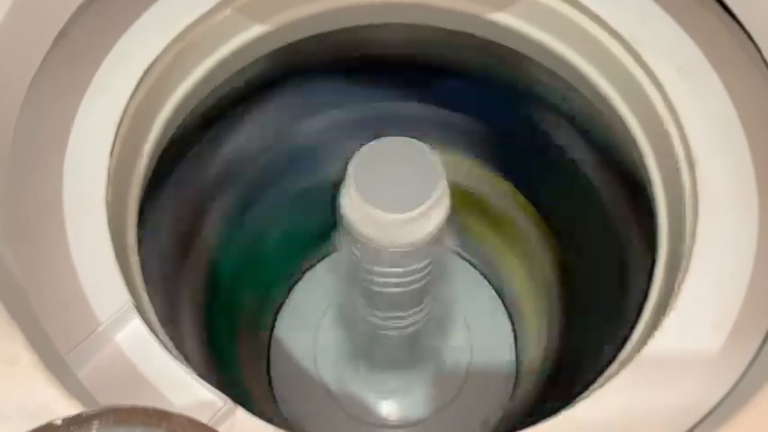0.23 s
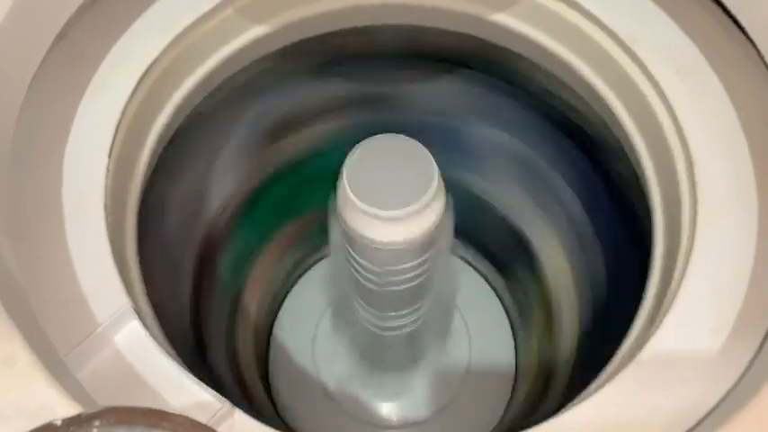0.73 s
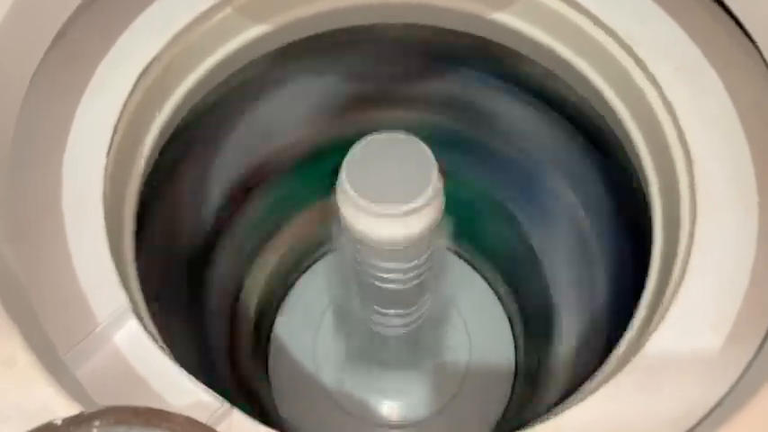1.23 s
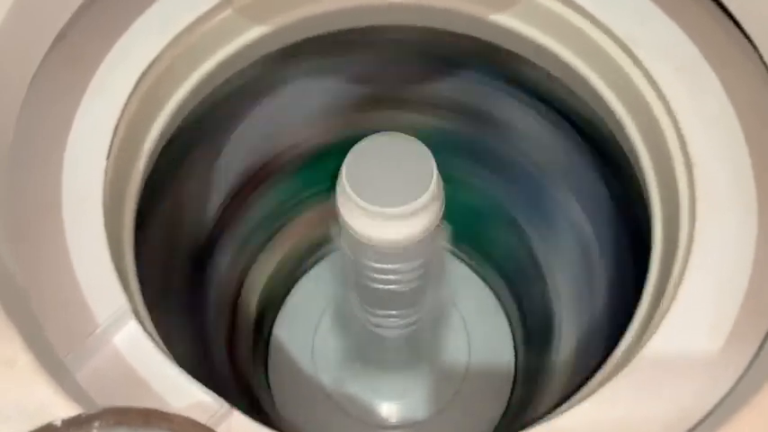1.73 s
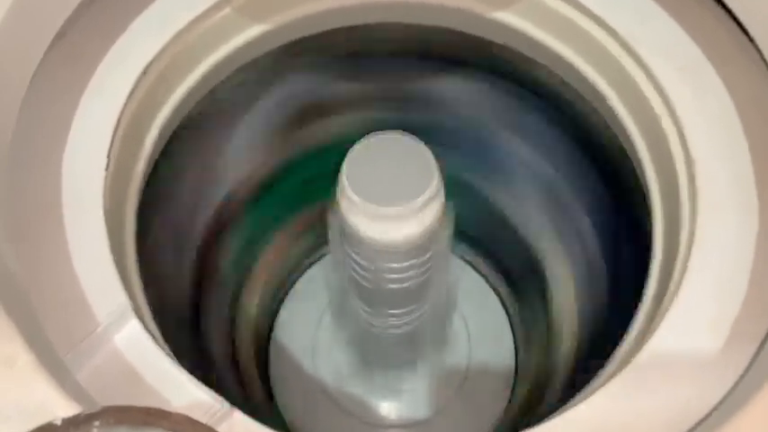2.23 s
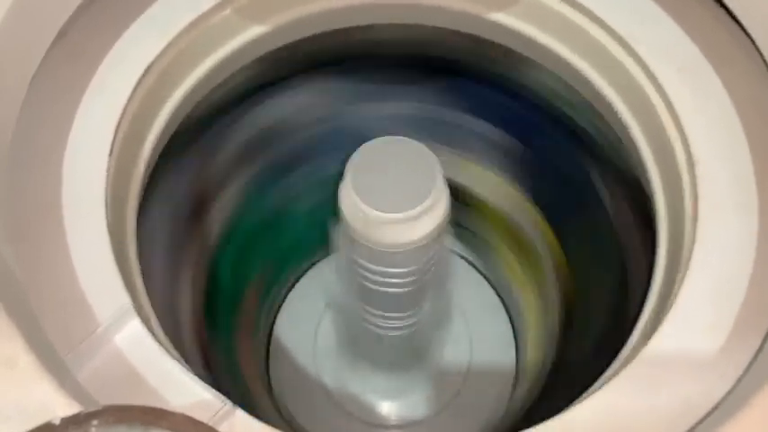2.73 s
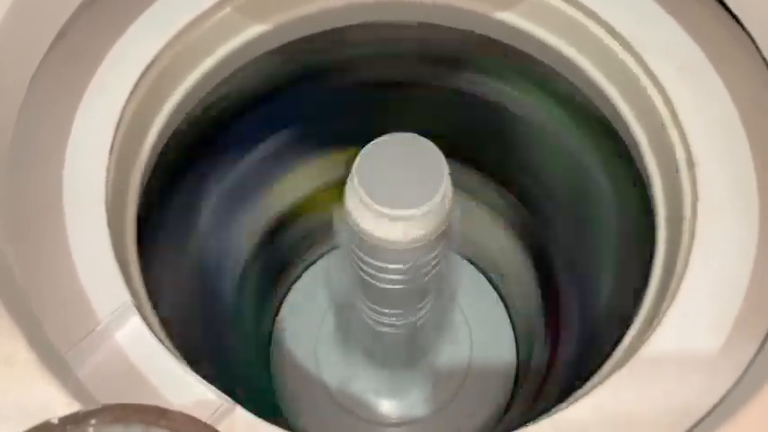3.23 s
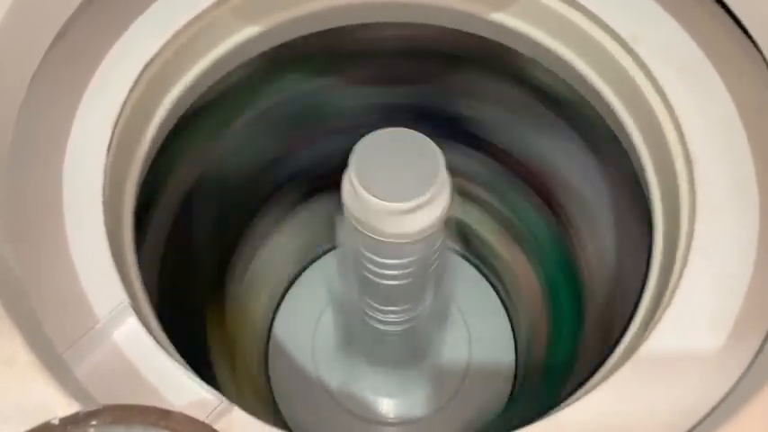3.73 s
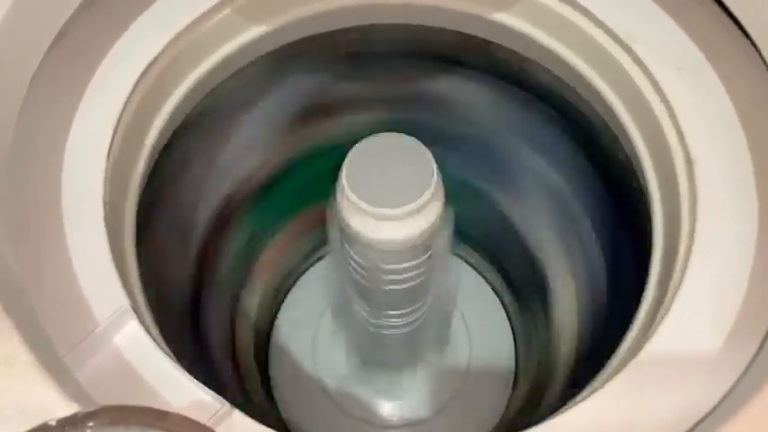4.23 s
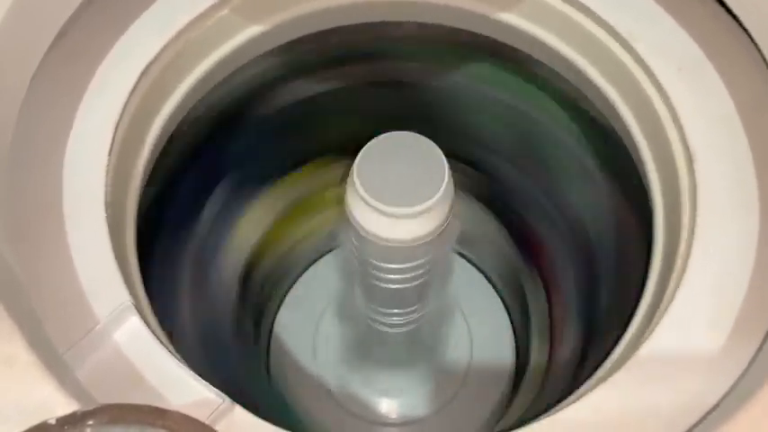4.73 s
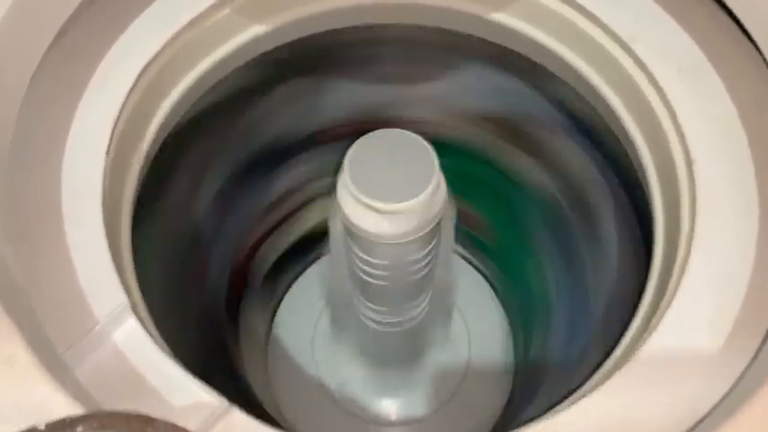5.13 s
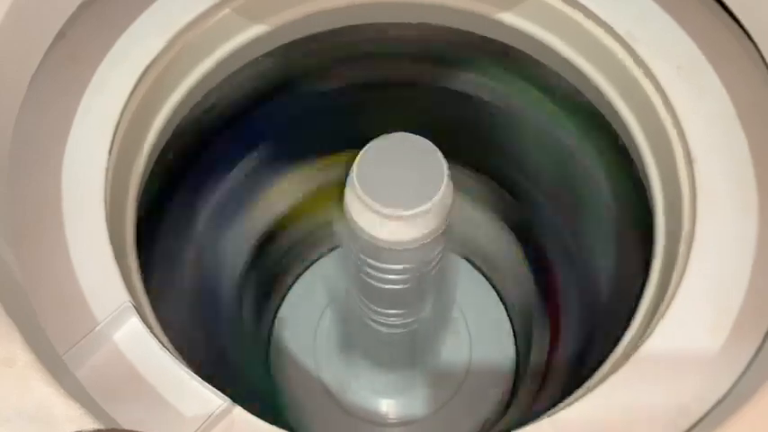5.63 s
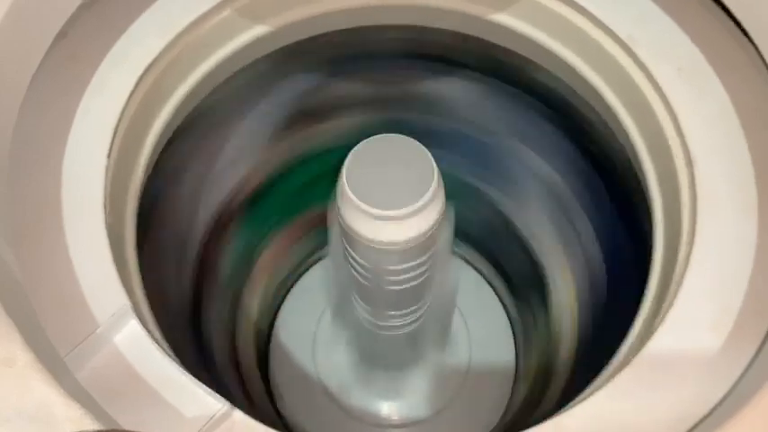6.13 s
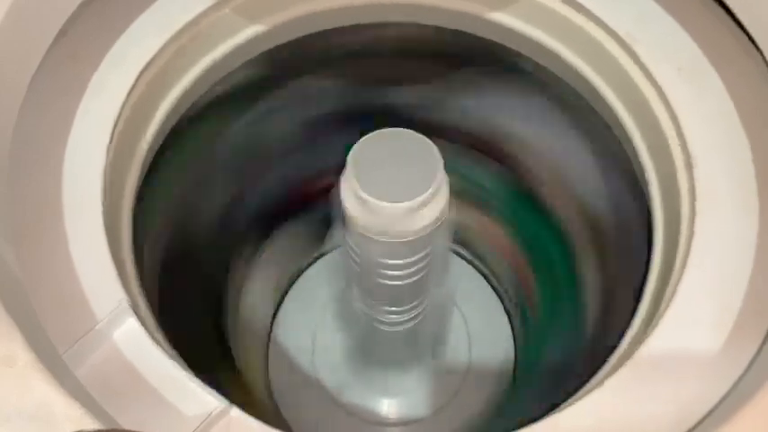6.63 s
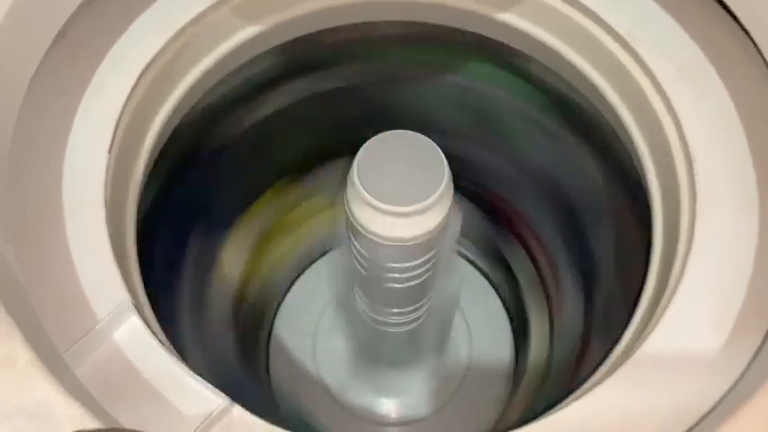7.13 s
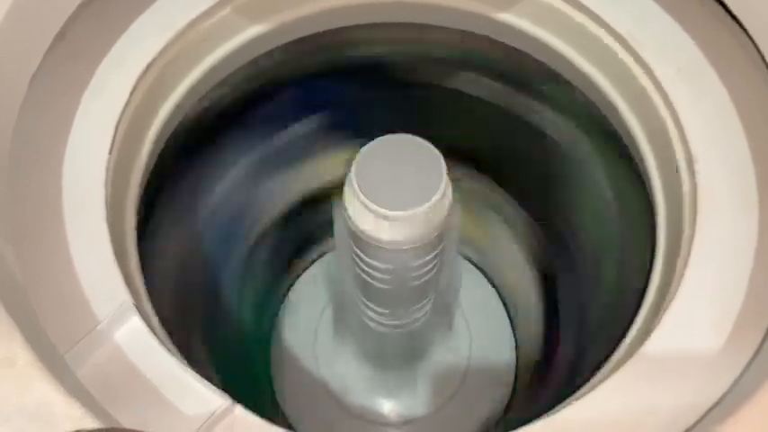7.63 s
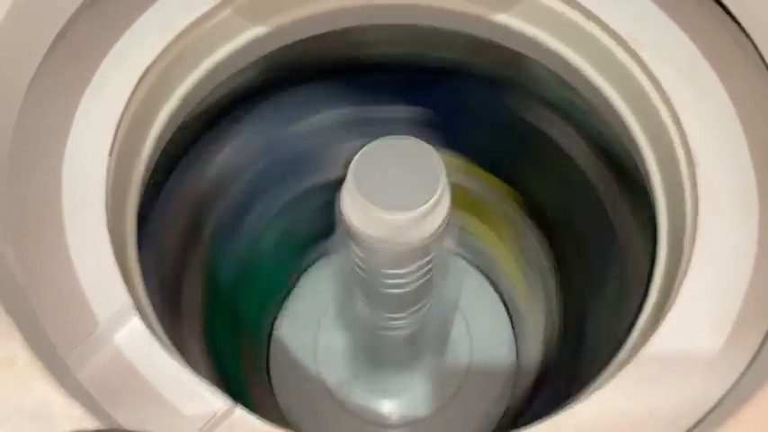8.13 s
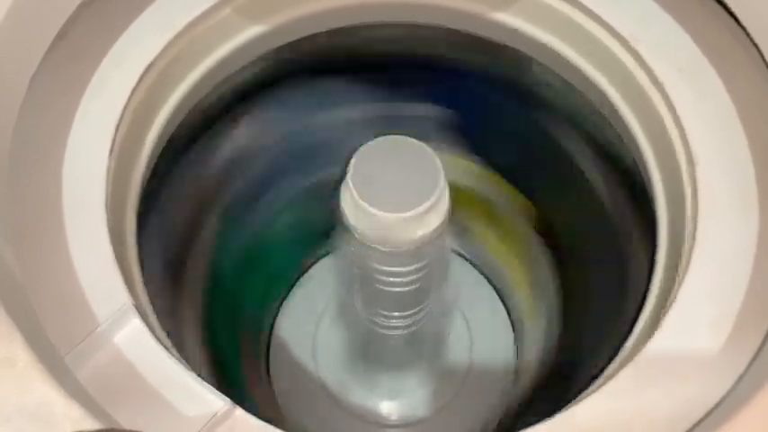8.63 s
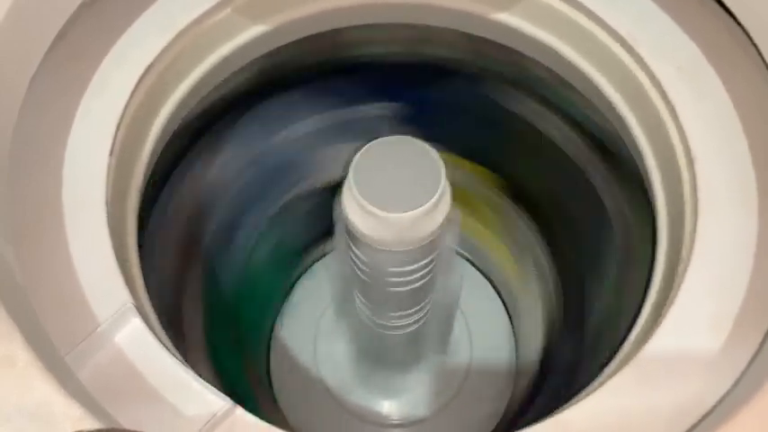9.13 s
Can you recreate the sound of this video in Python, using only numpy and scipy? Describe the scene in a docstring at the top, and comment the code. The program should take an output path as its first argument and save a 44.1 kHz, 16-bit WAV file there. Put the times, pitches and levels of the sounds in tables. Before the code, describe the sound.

Close above the open lid of a top-load washer, a wet load spins with deep shaking rumble, boomy panels and fluttering roar. A motor hums unevenly under a thin whine. For about three seconds water ticks and spatters rapidly on the tub wall, then drains in small chirping drips. Near five seconds comes one hollow knock with a splash. Everything slowly sinks in pitch and level.

```python
"""A wet load spins in a top-load washer, lid open, heard by two microphone ports just above the opening.
The tub rumbles and shakes in tones that sink as the basket slows from about ten to under eight turns a second.
Noise shaped by resonances booms and roars with brief accents, the motor hums and a drive whines.
For about three seconds water spurts tick and spatter on the tub wall, mostly two a turn, over wash and spray.
Near five seconds the tub knocks once with a splash, and the frame throbs on."""
import sys
import numpy as np
from scipy import signal
from scipy.fft import rfft, irfft
from scipy.io import wavfile
from scipy.ndimage import uniform_filter1d

SR = 44100
rng = np.random.default_rng(int(sys.argv[2]) if len(sys.argv) > 2 else 0)


def persist_wave(psi):
    """Save psi, clipped to +-1, as 16-bit WAV."""
    counts = np.round(np.clip(psi, -1, 1) * 32767).astype(np.int16)
    wavfile.write(sys.argv[1], SR, np.atleast_2d(counts).T)


N = 414540

# between the two microphone ports: f/Hz, likeness (0 to 1)
PORT_LIKENESS = [(30, .97), (60, .995), (130, .975), (290, .88), (640, .73), (1000, .53), (1500, .38),
                 (3000, .3), (5500, .45), (8000, .93), (15000, .98)]
# f/Hz, phase by which the left port leads/rad
PORT_LEAD = [(30, 0), (850, .1), (1400, -.9), (2400, -1.5), (4400, -1.0), (6400, 0), (8550, -3.14),
             (10900, -6.28), (13500, -9.42), (15800, -12.57)]
# f/Hz, left minus right level/dB
PORT_BALANCE = [(60, 1), (110, .8), (200, .6), (380, 1.7), (700, 2.5), (1290, 2.4), (2380, 1.2),
                (4400, -1.7), (8120, -.4), (15000, 0)]

# motor hum: multiple of the mains, relative level/dB
HUM_PARTIALS = [(1, -17), (2, -2), (4, -14.5)]
# the hum swells and eases: t/s, level/dB
HUM_LEVEL = [(0, -51), (.35, -32.5), (.53, -45), (1.0, -24.5), (1.32, -44), (1.62, -25.5), (1.88, -44),
             (2.1, -35.5), (2.8, -30.5), (3.65, -35.5), (4.1, -27.5), (5.05, -39), (5.4, -32),
             (5.65, -38.5), (6.65, -35), (7.35, -31), (7.8, -38), (9.25, -28.5)]
# housing resonances that let the whine through: f/Hz, width/Hz, relative level/dB
HOUSING_MODES = [(1350, 12, 4), (1253, 63, 4), (1160, 10, -2)]
# tones of the motor's shaft: multiple of its own rate, relative level/dB
ROTOR_TONES = [(5, -52), (6, -52), (7, -54), (8, -57), (10, -49), (11, -51), (12, -51), (14, -55),
               (15, -60), (16, -61)]

# broad boom of the side panels: f/Hz, relative level/dB
BOOM_COLOUR = [(90, -17), (138, 4), (170, -1.5), (260, -0.5), (380, -3.5), (425, -14.5), (520, -39),
               (900, -56)]
# side panel resonances above the boom: f/Hz, width/Hz, relative level/dB
PANEL_MODES = [(193, 30, 0.5), (203.5, 17.5, -2), (224, 16, -5.5), (309, 13, 3.5), (347, 56, -1.5),
               (368.7, 19, 4)]
# broad roar of churned air: f/Hz, relative level/dB
ROAR_COLOUR = [(250, -14.5), (430, -8), (510, -3.5), (650, -3), (760, -6.5), (900, -11.5), (1050, -16),
               (1400, -22.5), (2000, -28.5), (3500, -43), (8000, -58)]
# cabinet resonances above the roar: f/Hz, width/Hz, relative level/dB
CABINET_MODES = [(461.8, 8.3, 11), (612, 37, 0), (712, 9.6, 6.5), (727.6, 11.4, 6), (785, 5, 7),
                 (838, 6.4, 4.5), (955, 31.5, 9), (1092, 19, 3.5), (1178, 24, 8.5), (1234, 17.4, 11.5),
                 (1344, 18, 9.5), (1503, 48, 8), (1740, 29, 9), (1890, 30, -1)]
# the load shifts and the roar surges: t/s, spread/s, rise in level/dB
SURGES = [(0.173, 0.014, 4), (0.626, 0.16, 0), (0.937, 0.12, 1.5), (2.767, 0.054, 1.5), (3.05, 0.021, 3.5),
          (5.358, 0.096, 2), (6.602, 0.07, 0.5), (7.175, 0.25, 1.5), (8.74, 0.1, 3)]
# brief accents in the roar: t/s, relative level/dB, f of the short ring/Hz
ACCENTS = [(0.054, -20, 684), (0.144, -20, 460), (0.585, -13, 456), (0.925, -22, 447), (1.661, -16, 490),
           (1.788, -25, 660), (2.786, -14, 600), (3.618, -26, 606), (4.197, -20, 723), (4.233, -21, 745),
           (4.336, -24, 610), (4.595, -25, 474), (5.325, -19, 743), (5.697, -28, 580), (6.074, -19, 626),
           (6.531, -17.5, 550), (7.062, -18, 460), (7.11, -31, 585), (7.221, -20, 733), (7.261, -13.5, 457),
           (8.538, -20, 744), (8.914, -19.5, 706), (9.294, -27, 600)]

# water washing round the tub: f/Hz, relative level/dB
WASH_COLOUR = [(700, -0.6), (1400, -0.6), (1800, 3.4), (2100, 3.4), (2500, 3.4), (3000, -2.1),
               (3600, -11.6), (5000, -17.1), (9000, -41)]
# fine spray on the wall: f/Hz, relative level/dB
SPRAY_COLOUR = [(2000, -18.1), (3600, 4.4), (4200, 8.4), (4650, 10.1), (5300, 2.1), (6300, 4.6),
                (8000, -10.4), (9000, -7.1), (10800, -2.1), (13000, 2.4), (14500, -4.1), (16000, -4.6)]
# drops bursting on the wall: f/Hz, relative level/dB
SPATTER_COLOUR = [(2500, -59), (4400, 2.6), (5500, 3.6), (6800, 8.1), (9000, 7.1), (10800, 7.1),
                  (13000, -5.9), (16000, 2.5)]
# steel basket resonances in wash and spray: f/Hz, width/Hz, relative level/dB
BASKET_MODES = [(2366, 70, -1.4), (3300, 84, 1), (4680, 63, 0.6), (4900, 76, -0.6), (7580, 390, 10.8),
                (9420, 460, 12.3)]
# big single drops: t/s, level/dB
BIG_DROPS = [(.064, -36), (.543, -42), (.727, -40), (1.021, -40), (1.505, -37), (1.722, -37), (2.322, -41),
             (2.503, -35), (2.706, -33), (2.948, -39)]
# wall resonances under single drops: f/Hz, width/Hz, relative level/dB
DROP_MODES = [(2700, 830, -2.5), (4450, 500, 3.5), (6400, 1500, -3), (10400, 1500, -8)]
# spurts on the tub wall: t/s, relative slap level/dB, relative spatter level/dB
SPURTS = [(0.0275, -37, -46), (0.0605, -34, -39), (0.1057, -38, -50), (0.1382, -34, -53),
          (0.2054, -44, -49), (0.2339, -41, -48), (0.3017, -40, -47), (0.3266, -34, -46),
          (0.3955, -34, -49), (0.4299, -39, -55), (0.513, -32, -46), (0.5886, -43, -48), (0.6215, -38, -58),
          (0.6917, -33.5, -49), (0.7794, -41, -55), (0.8126, -42, -56), (0.8918, -33, -46),
          (0.92, -34, -43), (0.9762, -40, -48), (1.0026, -33, -43), (1.0231, -42, -54), (1.0725, -48, -55),
          (1.0989, -39, -58), (1.1812, -33.5, -43.5), (1.2104, -37, -52), (1.271, -39, -53),
          (1.298, -33.5, -44), (1.3912, -37, -50), (1.4147, -40, -50), (1.4725, -32.5, -44),
          (1.498, -30, -42), (1.5638, -41, -47), (1.5958, -33, -50), (1.6791, -34.5, -43),
          (1.713, -34.5, -44), (1.7664, -39, -48), (1.793, -33.5, -49), (1.9195, -45, -57),
          (1.9777, -33, -49), (2.0086, -37, -51), (2.0687, -37, -47), (2.094, -37, -50), (2.171, -36, -43),
          (2.1997, -40, -46), (2.2847, -32.5, -41), (2.319, -32.5, -39), (2.3757, -36, -47),
          (2.4074, -34.5, -48), (2.489, -30.5, -42), (2.5272, -36, -45), (2.5731, -43, -62),
          (2.592, -32.5, -36), (2.692, -35, -38), (2.7442, -46, -46.5), (2.8075, -46, -47),
          (2.8559, -48, -53), (2.9083, -45, -53), (2.9507, -42, -47)]
# tub wall resonances under a spurt: f/Hz, width/Hz, relative level/dB
SLAP_MODES = [(2500, 590, 1), (3030, 510, -1.5), (5200, 2500, -10)]
# drips chirping as the wall drains: t/s, starting f/Hz, level/dB
DRIPS = [(2.706, 2060, -41), (2.744, 2130, -40), (2.807, 2160, -43), (2.808, 2600, -48), (2.852, 2400, -48),
         (2.857, 2140, -39), (2.908, 2150, -42), (2.909, 2420, -45), (2.948, 2600, -47), (3.031, 2130, -43),
         (3.094, 2410, -44), (3.135, 2380, -48)]

# scuffs of wet cloth: t/s, spread/s, level/dB
SCUFFS = [(7.27, .014, -43), (8.8, 0.013, -40)]
# brief panel drones: t/s, spread/s, f at that moment/Hz, level/dB
DRONES = [(0.18, 0.047, 463, -31.5), (0.294, 0.34, 726, -42), (0.623, 0.038, 461, -29.5),
          (0.55, 0.11, 219, -36.5), (0.603, 0.24, 335, -39), (1.686, .07, 180, -34.5),
          (1.782, 0.06, 322, -36), (1.808, 0.021, 690, -33), (2.783, 0.08, 368.6, -35.5),
          (3.056, 0.06, 361.4, -36), (4.155, .07, 195.5, -38), (4.3, .1, 356, -41), (5.204, .1, 180.6, -38),
          (5.761, 0.066, 332, -37), (6.85, 0.089, 196, -34), (7.1, 0.17, 318, -37),
          (7.377, 0.048, 193.3, -31), (7.783, 0.072, 193, -37.5), (8.251, 0.15, 364, -40),
          (8.737, 0.042, 474, -36)]
# modes of the knocked tub: f/Hz, level/dB, t60/s
KNOCK_MODES = [(107.6, -16, .25), (160, -21, .14), (190, -22, .22), (242, -8.5, .11), (490, -26, .06),
               (1225, -30, .035)]

# the load heaves and the tub swells: t/s, spread/s, rise in level/dB
HEAVES = [(0.397, 0.029, 6), (1.03, 0.053, 2), (2.043, 0.013, 7), (2.7, 0.13, 2.5), (4.13, 0.011, 6.5),
          (6.675, 0.016, 7)]
# random rumble of the tub: f/Hz, relative level/dB
RUMBLE_COLOUR = [(20, -53), (33, -39), (41, -17), (52, -17), (70, -4), (95, -1), (118, 0), (150, -14),
                 (300, -35), (1200, -110)]
# how strongly the tub answers a shake: f/Hz, relative level/dB
TUB_RESPONSE = [(50, -29), (58, -16), (65, -10.5), (70, -5.5), (77, -0.5), (85, -2.5), (93, 1.5), (100, 0),
                (122, 0), (135, -8), (150, -15)]
# tones of the basket: multiple of its turning rate, relative level/dB
BASKET_SHAKES = [(6, -40), (7, -32.5), (8, -34), (9, -40), (10, -40), (11, -36), (13, -39), (14, -44),
                 (15, -44)]
# tones of the belt: multiple of its own rate, relative level/dB
BELT_SHAKES = [(10, -40), (11, -35), (12, -35.3), (13, -33.5), (14, -33), (15, -45), (17, -41), (18, -42),
               (19, -40), (21, -42), (22, -44)]

# speed of the basket at the start, its loss each second, and how that loss eases
TURNS_PER_S, SLOWING_PER_S2, EASING_PER_S3 = 10.477, .3041, .0018
# rounds of the belt, rounds of the motor's shaft and cycles of whine and frame throb per turn of the basket
BELT_PER_TURN, ROTOR_PER_TURN, WHINE_PER_TURN, THROB_PER_TURN = .6554, 6.358, 139.88, 5
MAINS_HZ = 60.05
KNOCK_S = 4.886
SPLASH_S, SPLASH_SPREAD_S = 4.885, .06
# water flies until this time, then dies away
FLING_END_S, FLING_FADE_S = 2.5, .12


def from_db(db):
    """Decibels to gain."""
    return 10 ** (np.asarray(db) / 20)


def to_left(db):
    """Gains that set the left port this many dB above the right."""
    return from_db([[db / 2], [-db / 2]])


def rms_one(x):
    """Scale to unit rms."""
    return x / np.sqrt(np.mean(x ** 2) + 1e-20)


def seconds():
    """Time of every sample."""
    return np.arange(N) / SR


def bins():
    """Frequency of every spectral bin in Hz, at least 1."""
    return np.maximum(np.arange(N // 2 + 1) * SR / N, 1)


def in_hz(points):
    """Join (f/Hz, value) points on a log-frequency axis."""
    hz, value = np.transpose(points)
    return np.interp(np.log(bins()), np.log(hz), value)


def drift(rate_hz):
    """Random wander of rms 1, ever weaker above its rate."""
    white = rfft(rng.standard_normal(N))
    return rms_one(irfft(white / (1 + (bins() / rate_hz) ** 2), N))


def swell(s, spread_s):
    """A smooth bell-shaped rise and fall around one moment."""
    return np.exp(-.5 * ((seconds() - s) / spread_s) ** 2)


def sinking(start_db, fall_db_per_s):
    """A level in dB that falls evenly with time."""
    return start_db - fall_db_per_s * seconds()


def speed():
    """Turns of the basket per second as it coasts down."""
    return TURNS_PER_S - SLOWING_PER_S2 * seconds() + EASING_PER_S3 * seconds() ** 2


def turns():
    """Turns of the basket so far."""
    return np.cumsum(speed()) / SR


def resonances(modes):
    """Summed power response of (f/Hz, width/Hz, level/dB) resonances."""
    f = bins()
    total = np.zeros(len(f))
    for hz, width, db in modes:
        detuning = (f * f - hz * hz) / (f * width)
        total += from_db(db) ** 2 / (1 + detuning ** 2)
    return total


def each_turn(size=4096):
    """Two random patterns that come round again with every turn of the basket."""
    place = turns() % 1 * size
    patterns = rng.standard_normal((2, size))
    return np.array([np.interp(place, np.arange(size), pattern) for pattern in patterns])


def stereo_noise(gain, unit=True, repeating=0):
    """Coloured noise at the two ports, a share of its power repeating every turn; rms 1 if unit."""
    white = rng.standard_normal((2, N))
    if repeating:
        white = np.sqrt(1 - repeating) * white + np.sqrt(repeating) * each_turn()
    mid, side = rfft(white)
    alike = np.clip(in_hz(PORT_LIKENESS), 0, 1)
    sign = np.array([[1], [-1]])   # left, right
    pair = np.sqrt(1 + alike) * mid + sign * np.sqrt(1 - alike) * side
    balance = from_db(sign * in_hz(PORT_BALANCE) / 2)
    lead = np.exp(.5j * sign * in_hz(PORT_LEAD))
    noise = irfft(gain * pair * balance * lead, N)
    return rms_one(noise) if unit else noise


def resonant_noise(broad, modes, waver_db=2.5, groups=3):
    """Partly repeating broad noise, with groups of resonances that wax and wane independently; rms 1."""
    colour = from_db(in_hz(broad))
    noise = stereo_noise(colour, unit=False, repeating=.45)
    for k in range(groups):
        peaks = stereo_noise(colour * np.sqrt(resonances(modes[k::groups])), unit=False)
        noise = noise + peaks * from_db(waver_db * drift(.48))
    return rms_one(noise)


def tone(hz, waver_db, waver_hz, wander_rad):
    """A sine of rms about 1 that wavers in level and phase."""
    phase = 2 * np.pi * np.cumsum(hz * np.ones(N)) / SR + wander_rad * drift(waver_hz)
    return np.sqrt(2) * np.sin(phase) * from_db(waver_db * drift(waver_hz))


def partial(cycles):
    """A clean sine of rms 1 that follows a count of cycles, from a random phase."""
    return np.sqrt(2) * np.sin(2 * np.pi * (cycles + rng.random()))


def struck(s, hz, db, t60, rise_s, glide_per_s=0):
    """A sine that starts at one moment, builds up, dies away and may glide upward."""
    out, start = np.zeros(N), int(s * SR)
    age = np.arange(min(int(2 * t60 * SR), N - start)) / SR
    envelope = from_db(db - 60 * age / t60) * (1 - np.exp(-age / rise_s))
    cycles = hz * age * (1 + glide_per_s * age / 2)
    out[start:start + len(age)] = envelope * np.sin(2 * np.pi * cycles)
    return out


def impulses(times, levels_db):
    """One-sample clicks at the given times."""
    clicks = np.zeros(N)
    clicks[np.round(times * SR).astype(int)] = from_db(levels_db)
    return clicks + 1e-18   # keeps the filters clear of vanishing numbers


def dying(clicks, t60):
    """Each click starts an exponential decay of its own height."""
    return signal.lfilter([1], [1, -from_db(-60 / (t60 * SR))], clicks)


def bursts(times, levels_db, hit_t60, tail_t60, tail_db, rise_s):
    """Envelope of a row of bursts: each quick and rounded, with a weaker, longer tail."""
    clicks = impulses(times, levels_db)
    shape = dying(clicks, hit_t60) + from_db(tail_db) * dying(clicks, tail_t60)
    rise = max(int(rise_s * SR), 1)
    return uniform_filter1d(uniform_filter1d(shape, rise), rise)


def motor_hum():
    """Magnetic hum on multiples of the mains, swelling and easing."""
    level_db = np.interp(seconds(), *np.transpose(HUM_LEVEL))
    tones = sum(from_db(db) * tone(k * MAINS_HZ, waver_db=-.6, waver_hz=11.4, wander_rad=.16)
                for k, db in HUM_PARTIALS)
    return from_db(level_db) * tones * to_left(.8)


def frame_throb():
    """A deep tone locked to the basket sets in at the knock and dies away."""
    age = np.maximum(seconds() - KNOCK_S, 0)
    level = (1 - np.exp(-age / .1)) * from_db(-45.5 - 4.5 * age)
    throb = tone(THROB_PER_TURN * speed(), waver_db=4, waver_hz=1.5, wander_rad=.2)
    return level * throb * to_left(.8)


def drive_whine():
    """A thin whine sinks with the speed and grows as it passes resonances of the housing."""
    hz = WHINE_PER_TURN * speed()
    passing = np.interp(hz, bins(), np.sqrt(resonances(HOUSING_MODES)))
    # the two ports hear independent wavering
    whine = np.array([tone(hz, waver_db=2.8, waver_hz=9, wander_rad=1.2) for port in range(2)])
    return from_db(-56) * passing * whine


def rotor():
    """The motor's shaft sings on its multiples, which wax, wane and wobble once per basket turn."""
    angle = turns()
    tones = 0
    for k, db in ROTOR_TONES:
        wobble = 1 + .58 * partial(angle)
        tones = tones + from_db(db + 2.5 * drift(.84)) * wobble * partial(k * ROTOR_PER_TURN * angle)
    return from_db(sinking(1.65, .53)) * tones * to_left(2.2)


def surging():
    """Extra dB while the load shifts."""
    return sum(db * swell(s, spread) for s, spread, db in SURGES)


def cabinet():
    """Panels boom; churned air roars, flutters at random as clothes sweep past, and surges as they shift."""
    surge_db = surging()
    boom_db = sinking(-33, .23) + .57 * surge_db + 1.48 * drift(19)
    roar_db = sinking(-32, .59) + surge_db + 1.16 * drift(43)
    boom = from_db(boom_db) * resonant_noise(BOOM_COLOUR, PANEL_MODES)
    roar = from_db(roar_db) * resonant_noise(ROAR_COLOUR, CABINET_MODES)
    return boom + roar


def roar_accents():
    """Each accent is a dull noise burst in the roar's colour with a short sine ring."""
    times, levels_db, _ = np.transpose(ACCENTS)
    dull = bursts(times, levels_db - 10, hit_t60=.044, tail_t60=.05, tail_db=-18, rise_s=.0011)
    rings = sum(struck(s, hz, db - 8.5, t60=.06, rise_s=.5 / hz) for s, db, hz in ACCENTS)
    return dull * stereo_noise(from_db(in_hz(ROAR_COLOUR))) + rings * to_left(2.4)


def tub_echoes(count=24):
    """Random short reflections inside the tub lay a fine steady ripple on the spectrum."""
    paths = np.zeros(N)
    paths[0] = 1   # direct sound
    delays_s = rng.uniform(.003, .02, count)
    paths[(delays_s * SR).astype(int)] = .08 * rng.choice([-1, 1], count)
    return np.abs(rfft(paths))


def flinging():
    """1 while water still flies out of the load, easing to 0 afterwards."""
    return .5 - .5 * np.tanh((seconds() - FLING_END_S) / FLING_FADE_S)


def water():
    """Water washes round the tub and fine drops hiss, louder while water flies; it splashes once."""
    wet, splashing = flinging(), swell(SPLASH_S, SPLASH_SPREAD_S)
    walls = tub_echoes() * np.sqrt(1 + resonances(BASKET_MODES))
    wash_db = sinking(-50.5, .29) + 2.3 * wet + .18 * surging() + 4 * splashing
    wash_db = wash_db + drift(44) + .5 * drift(11)
    spray_db = sinking(-52.1, .45) + .5 * wet + .4 * drift(300) + .91 * drift(15)
    wash = from_db(wash_db) * stereo_noise(walls * from_db(in_hz(WASH_COLOUR)))
    spray = from_db(spray_db) * stereo_noise(walls * from_db(in_hz(SPRAY_COLOUR)))
    splash_level = from_db(-52 + 2.1 * drift(150)) * splashing
    return wash + spray + splash_level * stereo_noise(from_db(in_hz(SPATTER_COLOUR)))


def single_drops(count=50):
    """Drops tick on the wall: big ones at set times, mostly fainter ones at random while water flies."""
    faint_s = rng.uniform(0, FLING_END_S, count)
    faint_db = -46.5 + 2 * rng.standard_normal(count)
    times, levels_db = np.transpose(np.vstack([BIG_DROPS, np.column_stack([faint_s, faint_db])]))
    ticks = bursts(times, levels_db, hit_t60=.014, tail_t60=.075, tail_db=-17, rise_s=.0014)
    return ticks * stereo_noise(np.sqrt(resonances(DROP_MODES)))


def drips():
    """Soft ringing sines chirp upward as the wall drains."""
    chirps = sum(struck(s, hz, db, t60=210 / hz, rise_s=.002, glide_per_s=.8) for s, hz, db in DRIPS)
    return chirps * to_left(3)


def spurts():
    """Each spurt slaps the wall in its own mix of modes, breaks into bright drops and leaves a faint ring."""
    times, slap_db, spatter_db = np.transpose(SPURTS)
    slap = 0
    for hz, width, db in SLAP_MODES:
        levels_db = slap_db - 6.5 + db + 1.4 * rng.standard_normal(len(times))
        hits = bursts(times, levels_db, hit_t60=.012, tail_t60=.065, tail_db=-9, rise_s=.0006)
        slap = slap + hits * stereo_noise(resonances([(hz, width, 0)]))
    ring = bursts(times, slap_db - 12.5, hit_t60=.082, tail_t60=.11, tail_db=-10, rise_s=.0024)
    ring = ring * stereo_noise(resonances([(2110, 120, 0)]))
    spatter = bursts(times, spatter_db + 2, hit_t60=.02, tail_t60=.21, tail_db=-15.5, rise_s=.0025)
    spatter = spatter * stereo_noise(from_db(in_hz(SPATTER_COLOUR))) * from_db(2 * drift(900))
    return (slap + ring) * to_left(3) + spatter


def cracks():
    """The first contact of each spurt is one dry click, band-passed from 2 to 5.5 kHz."""
    times, slap_db, _ = np.transpose(SPURTS)
    band = signal.butter(2, (2000, 5500), "band", fs=SR, output="sos")
    return signal.sosfilt(band, impulses(times, slap_db + 9)) * to_left(2)


def scuffs():
    """Wet cloth scuffs briefly against the tub: swells of noise around 990 Hz."""
    level = sum(from_db(db) * swell(s, spread) for s, spread, db in SCUFFS)
    return level * stereo_noise(resonances([(990, 800, 0)]))


def panel_drones():
    """Panels drone briefly on tones that sink with the basket's speed."""
    rate, angle = speed(), turns()
    return sum(from_db(db) * swell(s, spread) * partial(angle * hz / rate[int(s * SR)])
               for s, spread, hz, db in DRONES)


def knock():
    """One knock sets the tub's modes ringing under a short noisy click."""
    ringing = sum(struck(KNOCK_S, hz, db, t60, rise_s=1.5 / hz) for hz, db, t60 in KNOCK_MODES)
    click = bursts(np.array([KNOCK_S]), -27, hit_t60=.015, tail_t60=.23, tail_db=-25, rise_s=.0018)
    return ringing + click * stereo_noise(from_db(in_hz(WASH_COLOUR)))


def tub_rumble():
    """Low random rumble whose swings in loudness are countered."""
    rumble = stereo_noise(from_db(in_hz(RUMBLE_COLOUR)))
    power = uniform_filter1d(np.mean(rumble ** 2, axis=0), int(.12 * SR))
    # an exponent of .5 would level it; .68 turns loud stretches slightly soft
    return from_db(sinking(-32.5, .32)) * rms_one(rumble / power ** .68)


def tub_shaking():
    """Basket and belt shake the tub in clean sinking tones that beat, weighted by the tub's response."""
    rate, angle = speed(), turns()
    shakes = BASKET_SHAKES + [(k * BELT_PER_TURN, db) for k, db in BELT_SHAKES]
    response = np.transpose(TUB_RESPONSE)
    tones = sum(from_db(db + np.interp(k * rate, *response)) * partial(k * angle) for k, db in shakes)
    return from_db(sinking(0, .36)) * tones * to_left(.8)


def tub():
    """Rumble and shaking swell together as the load heaves."""
    heave_db = sum(db * swell(s, spread) for s, spread, db in HEAVES)
    return from_db(heave_db) * (tub_rumble() + tub_shaking())


def scene():
    """Everything is heard from just above the open lid."""
    drive = motor_hum() + frame_throb() + drive_whine() + rotor()
    air = cabinet() + roar_accents()
    wet = water() + single_drops() + drips() + spurts() + cracks()
    load = scuffs() + panel_drones() + knock() + tub()
    return drive + air + wet + load


def record(dry):
    """The treble is cut steeply above 15.9 kHz."""
    return signal.sosfilt(signal.ellip(12, .1, 80, 15900, fs=SR, output="sos"), dry)


dry = scene()
out = record(dry)
persist_wave(out)
```